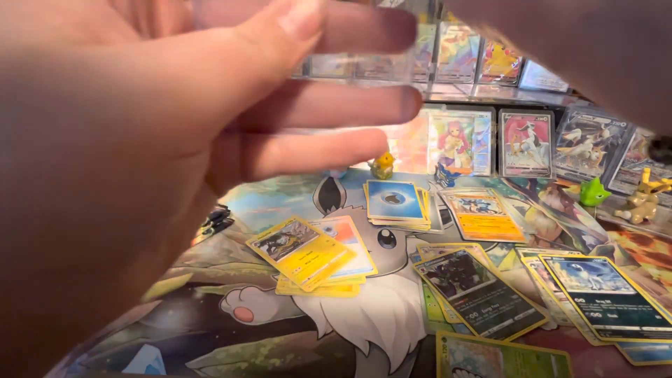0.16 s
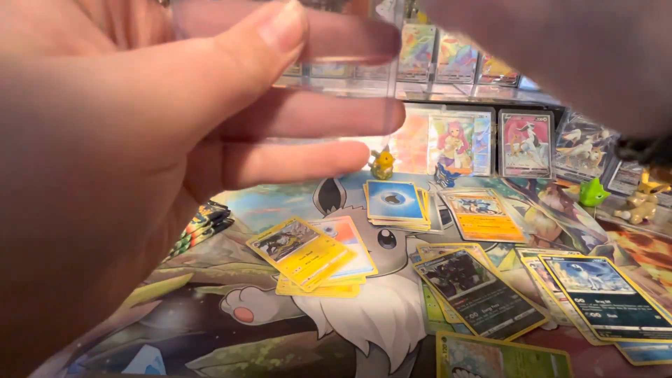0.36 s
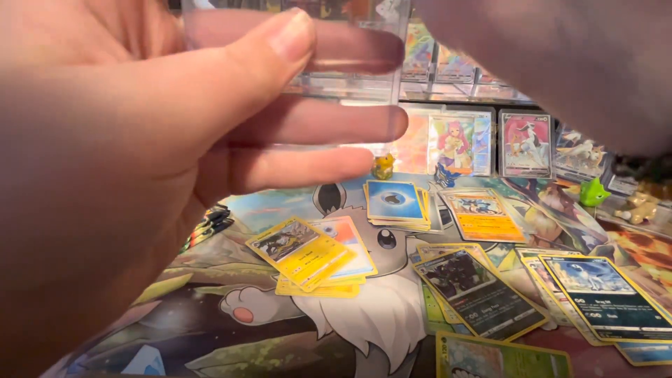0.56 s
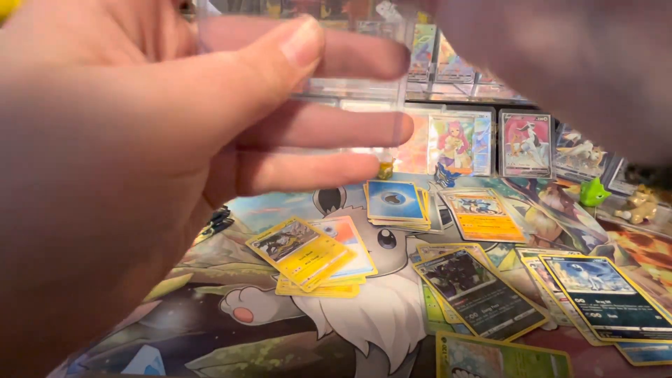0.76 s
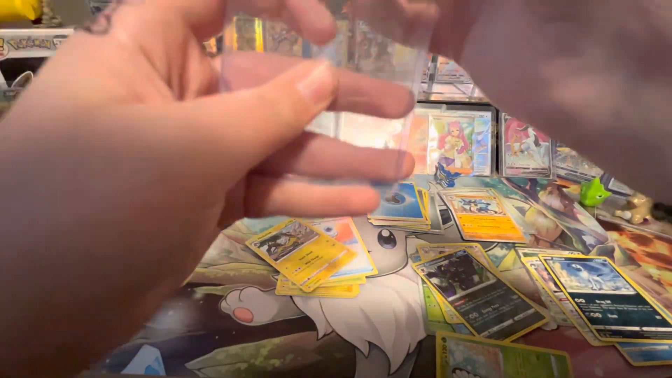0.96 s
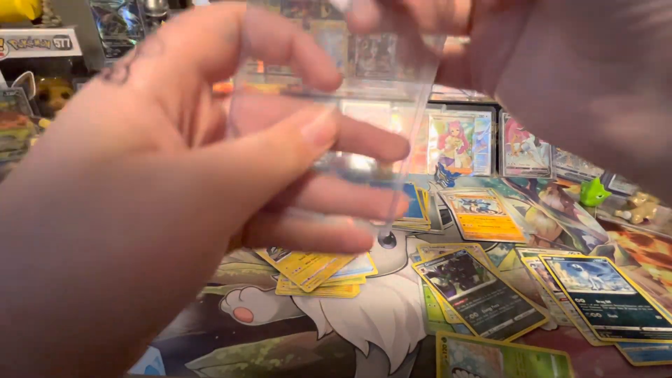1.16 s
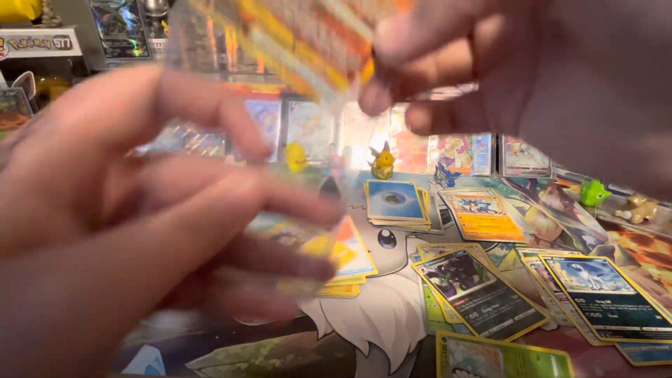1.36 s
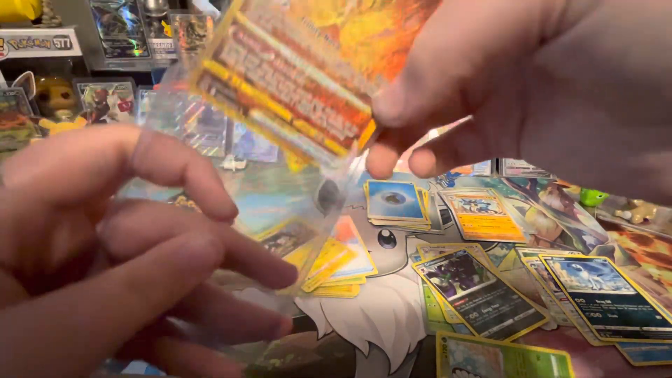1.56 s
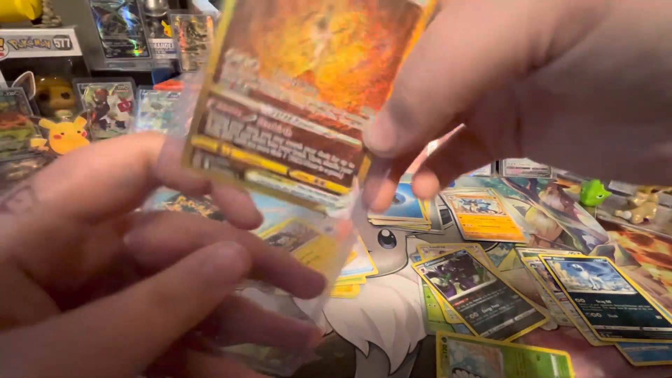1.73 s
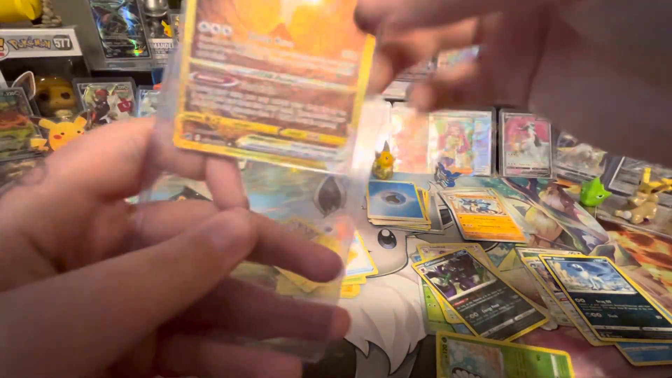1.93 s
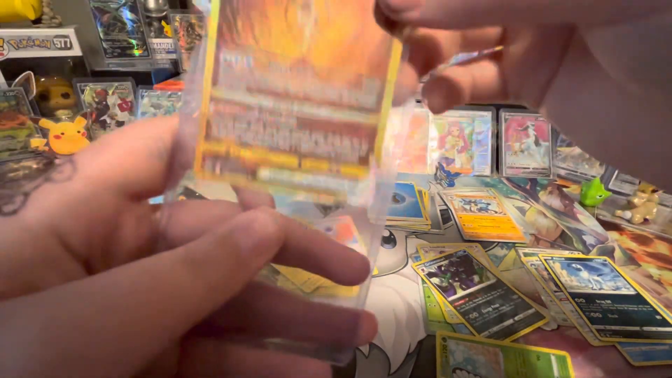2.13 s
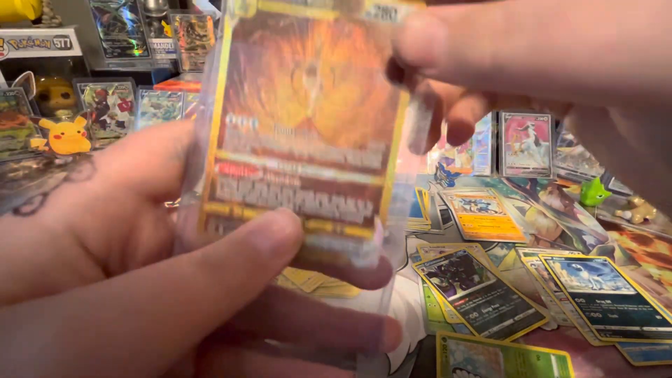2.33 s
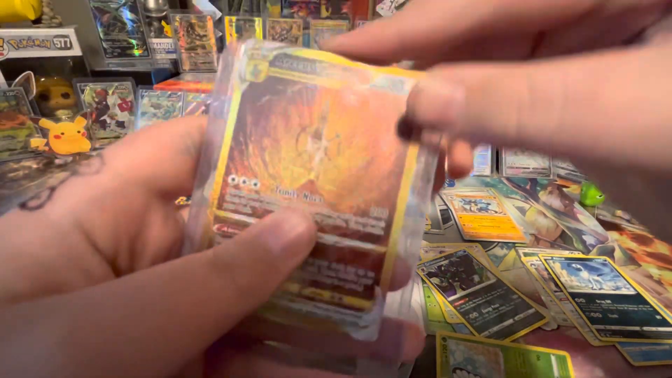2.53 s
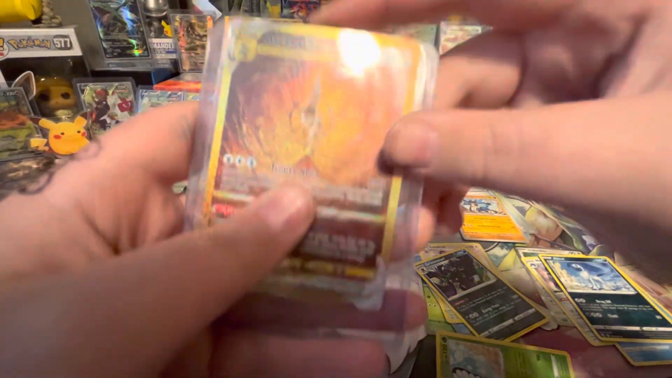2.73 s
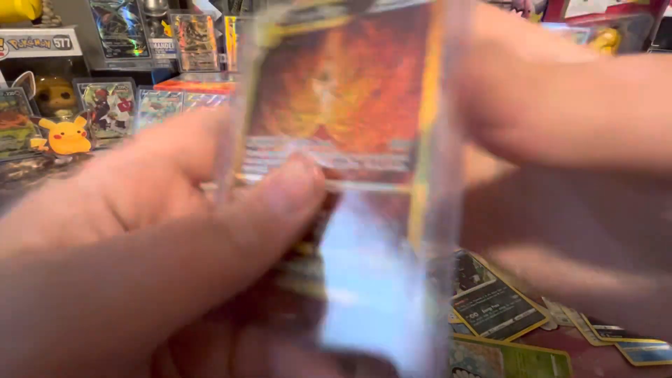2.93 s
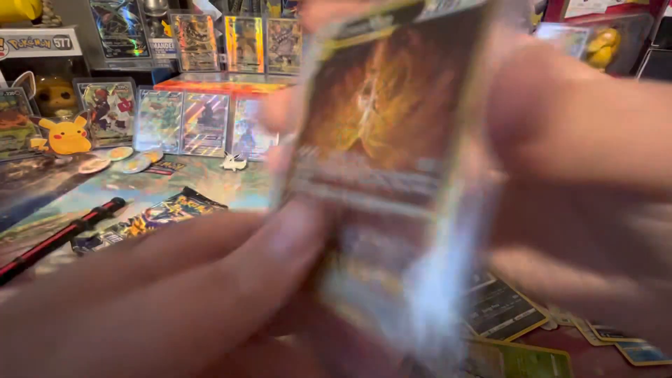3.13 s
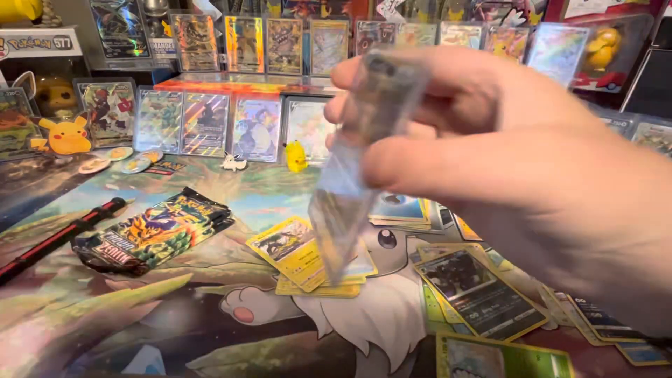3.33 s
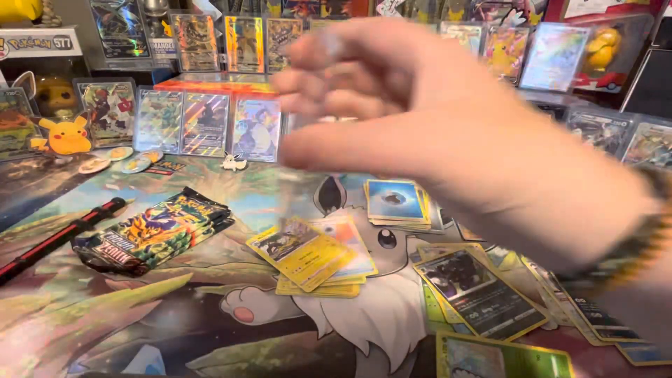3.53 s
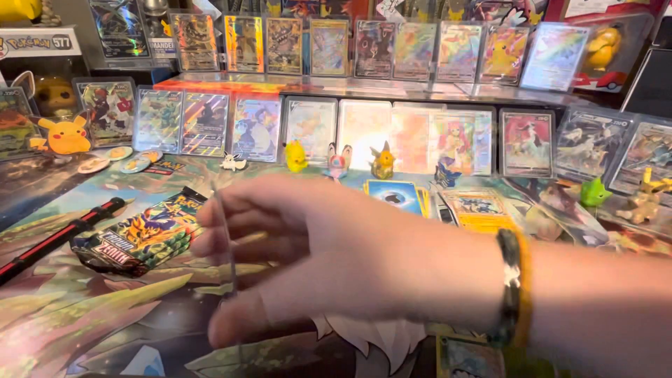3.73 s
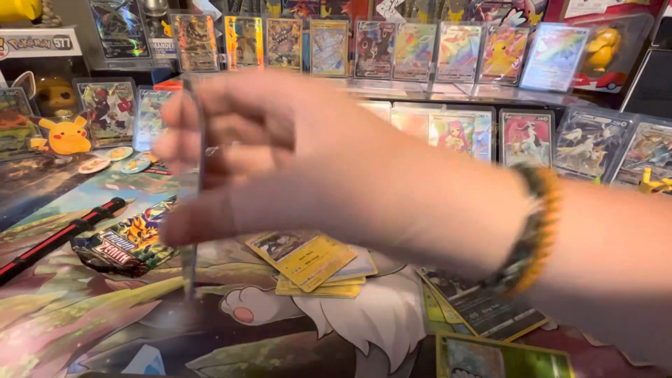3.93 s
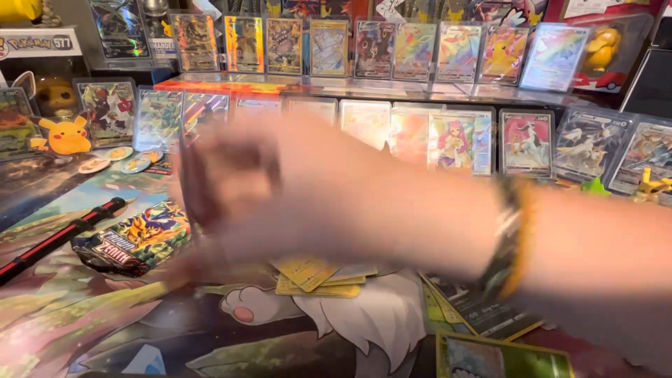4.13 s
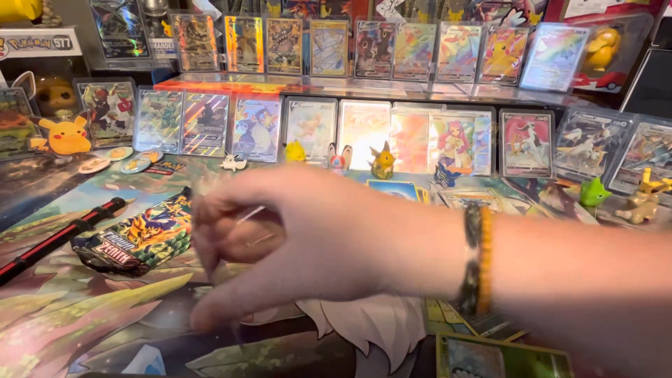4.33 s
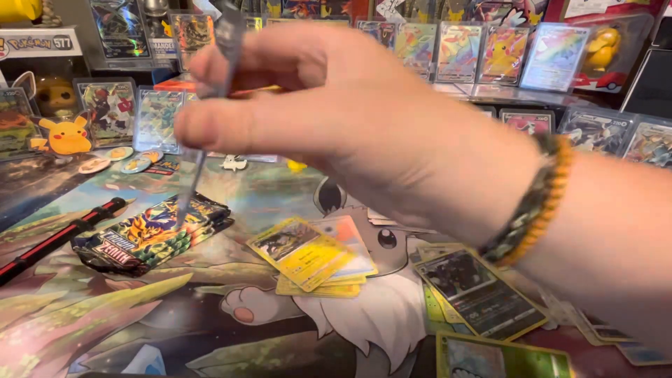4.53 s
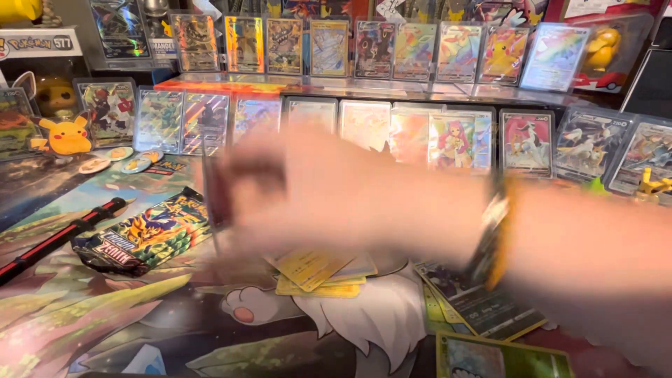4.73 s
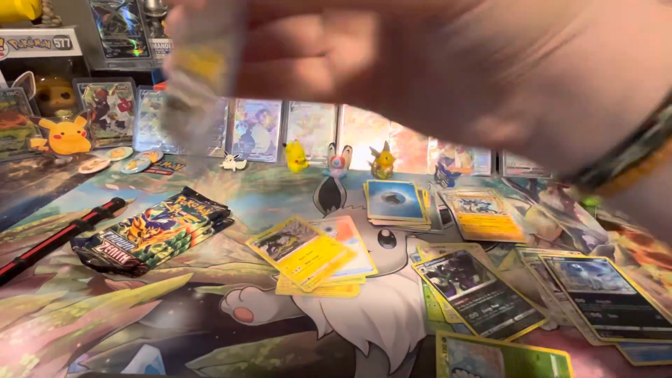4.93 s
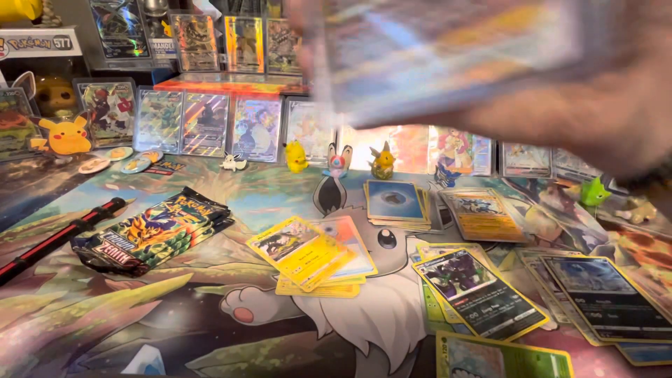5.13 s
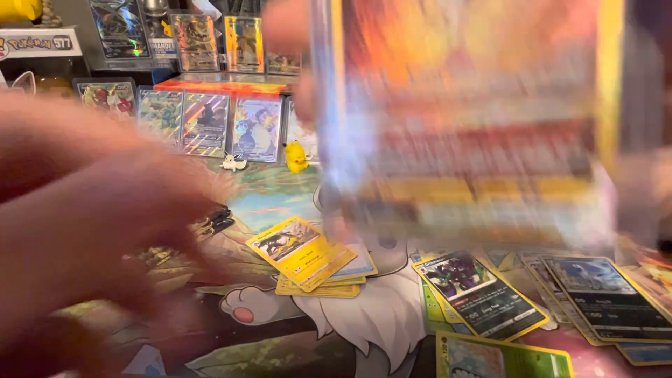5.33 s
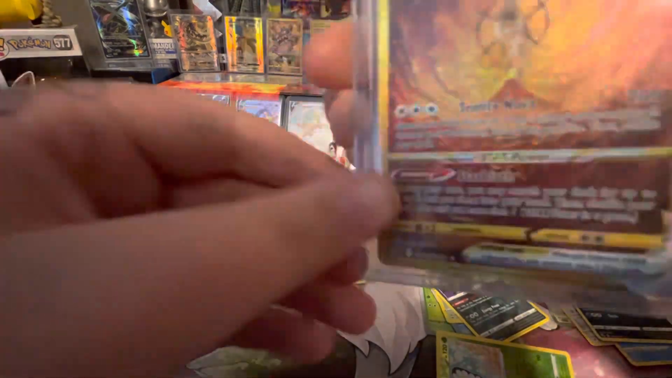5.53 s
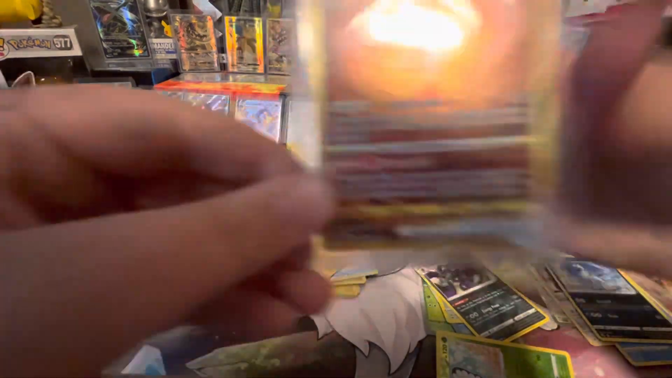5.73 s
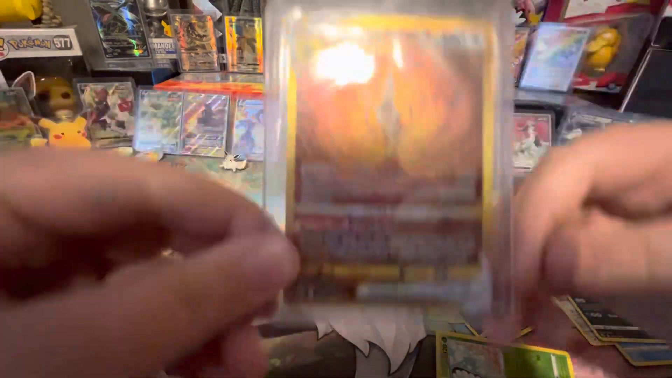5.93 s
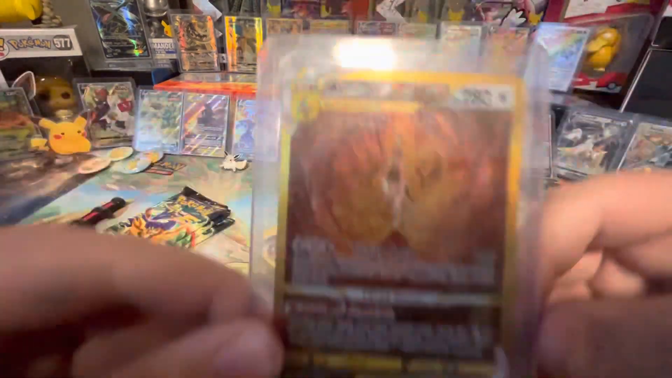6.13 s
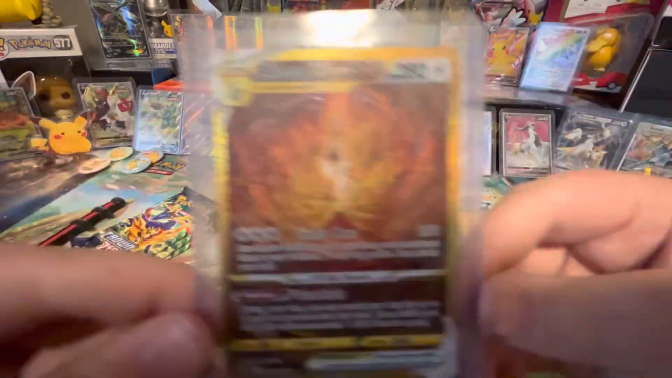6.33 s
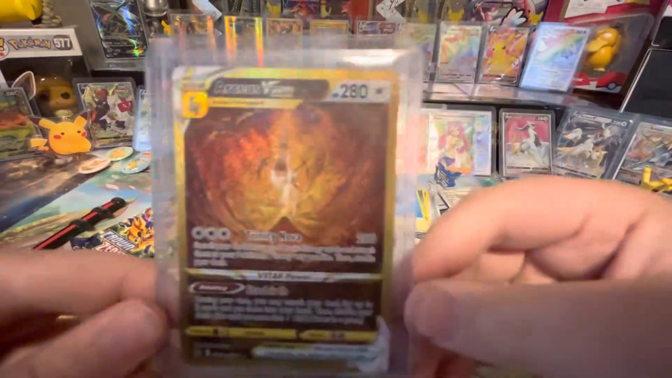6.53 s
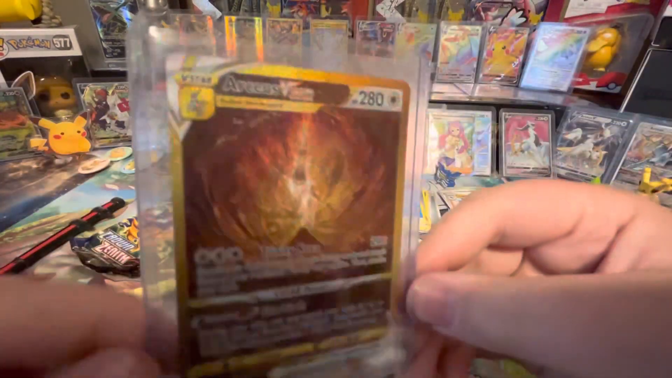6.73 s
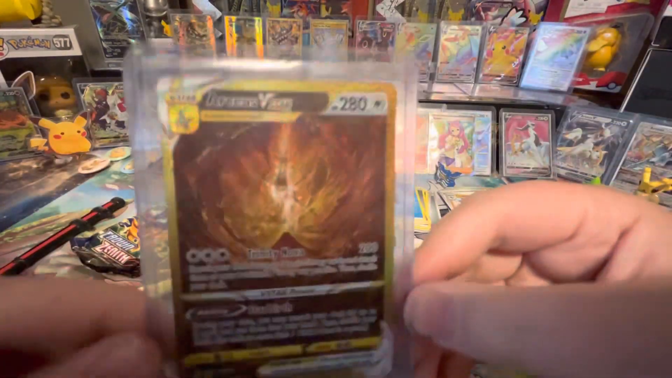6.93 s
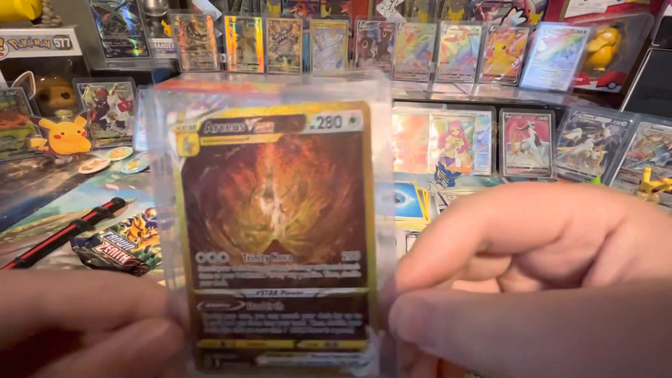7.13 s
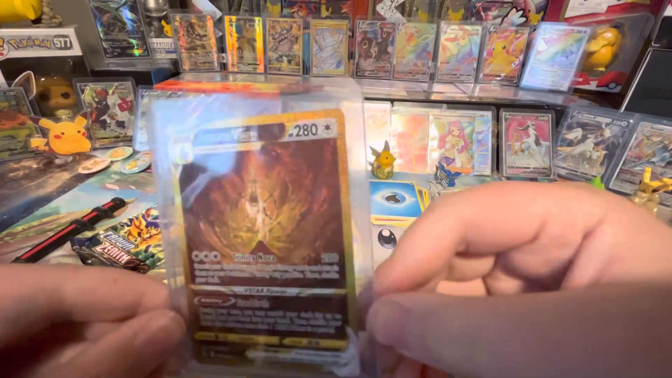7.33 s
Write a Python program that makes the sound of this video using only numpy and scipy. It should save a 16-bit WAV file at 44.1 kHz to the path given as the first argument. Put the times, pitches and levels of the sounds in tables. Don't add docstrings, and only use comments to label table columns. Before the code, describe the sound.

Close plastic rustling and sharp little clicks, four evenly spaced woody knocks with a slight rattle, then quiet finger scuffs in a humming room.

```python
import sys
import numpy as np
from scipy import signal
from scipy.io import wavfile

SR = 44100
rng = np.random.default_rng(int(sys.argv[2]) if len(sys.argv) > 2 else 0)


def gain_from_db(level_db):
    decades = np.asarray(level_db, float) / 20
    return 10 ** decades


def bounce(signal):
    frames = np.transpose(np.atleast_2d(signal))
    limited = np.clip(frames, -1, 1)
    pcm = np.round(limited * 32767).astype(np.int16)
    wavfile.write(sys.argv[1], SR, pcm)


N = 324926
RIGHT_LAG_S = 0.0005


def rms_one(x):
    return x / np.sqrt(np.mean(x ** 2) + 1e-20)


def in_time(rows):
    s, *columns = np.transpose(rows)
    return [np.interp(np.arange(N) / SR, s, column) for column in columns]


def at_hz(points, hz, column=1):
    points = np.array(points)
    return np.interp(np.log(hz), np.log(points[:, 0]), points[:, column])


def drift(rate_hz):
    every = 40
    r = np.exp(-2 * np.pi * rate_hz * every / SR)
    white = rng.standard_normal(N // every + 2002)
    slow = signal.lfilter([1], [1, -2 * r, r * r], white)[2000:]
    return np.interp(np.arange(N) / every, np.arange(len(slow)), rms_one(slow))


def resonance(x, hz, width_hz):
    r = np.exp(-np.pi * width_hz / SR)
    top = np.array([1, 0, -1]) * (1 - r * r) / 2
    return signal.lfilter(top, [1, -2 * r * np.cos(2 * np.pi * hz / SR), r * r], x)


def bands(size):
    # (pitch_hz, likeness from -1 to 1)
    likeness = [(60, 1), (130, 0.78), (290, 0.34), (640, 0.24), (1410, -0.46), (3100, 0.64), (6820, 0.072),
                (15000, 0.23)]
    edges = 25 * 2 ** np.arange(0, 9.6, 0.5)
    white = rng.standard_normal((2, 2, size))
    for k, (low, high) in enumerate(zip(edges, edges[1:])):
        band = signal.butter(2, [low, high], "band", fs=SR, output="sos")
        mid, side = signal.sosfilt(band, white[k % 2])
        hz = np.sqrt(low * high)
        alike = at_hz(likeness, hz)
        yield hz, np.sqrt(1 + alike) * mid + np.sqrt(1 - alike) * side * [[1], [-1]]


def add(out, s, sound):
    i = round(s * SR)
    out[..., i:i + sound.shape[-1]] += sound[..., :N - i]


def place(x, pan_db):
    late = np.roll(x, round(RIGHT_LAG_S * SR))
    return np.array([x * gain_from_db(pan_db / 2), late * gain_from_db(-pan_db / 2)])


def background():
    # (start_s, low_db, upper_db)
    rumble = [(0.0, -59, -76.5), (0.2, -59, -77.5), (0.63, -62, -69.5), (0.8, -58, -66.5),
              (1.13, -56.5, -62.5), (1.31, -59.5, -68), (1.72, -56, -71.5), (1.89, -57.5, -64),
              (2.15, -56, -60), (2.34, -57, -65), (2.52, -63, -71), (2.77, -60, -77), (2.95, -60.5, -68),
              (3.14, -53, -64.5), (3.3, -58.5, -74), (3.45, -60.5, -81), (3.67, -64, -77),
              (3.88, -58, -62.5), (3.94, -60.5, -77), (4.08, -54.5, -69), (4.23, -55, -73.5),
              (4.41, -71, -51), (4.52, -63, -72), (4.62, -54, -62.5), (4.86, -59, -75.5),
              (5.09, -61.5, -74.5), (5.4, -57, -67.5), (5.56, -56.5, -67.5), (6.05, -57.5, -78.5),
              (6.32, -62.5, -76), (6.75, -59, -74.5), (6.96, -60.5, -63), (7.37, -60.5, -83.5)]
    # (pitch_hz, level_db per Hz)
    floor_colour = [(15, -57), (25, -32.5), (43, -4), (82, -7), (123, 2.5), (200, -12), (242, -8),
                    (293, -29.5), (416, -12), (695, -41), (818, -40.5), (4740, -53.5), (7710, -68.5),
                    (9320, -43.5), (16000, -72)]
    # (pitch_hz, width_hz, level_db)
    hum_peaks = [(60.4, 4.1, -11), (118.4, 5.6, -0.5), (240, 4.1, -6), (447, 8.1, -26)]
    low_db, upper_db = in_time(rumble)
    low, upper, hiss = 0, 0, 0
    for hz, noise in bands(size=N):
        floor = gain_from_db(at_hz(floor_colour, hz) + 3.7 * drift(13)) * noise
        if hz < 300:
            low = low + floor
        elif hz < 1000:
            upper = upper + floor
        else:
            hiss = hiss + floor
    white = rng.standard_normal(N)
    hum = sum(gain_from_db(db) * rms_one(resonance(white, hz, width_hz)) for hz, width_hz, db in hum_peaks)
    sound = gain_from_db(low_db) * (gain_from_db(-0.5) * rms_one(low) + gain_from_db(-5.5) * hum)
    sound = sound + gain_from_db(upper_db) * rms_one(upper) + gain_from_db(-83.5) * rms_one(hiss)
    return sound * gain_from_db([[1.2], [-1.2]])


def slide():
    # (start_s, hiss_db, sheen_db above 9 kHz, body_db below 2.5 kHz, left_right_db)
    strokes = [
        [(0.0, -77.5, -3, 12.5, 11), (0.12, -82.5, 13.5, -8, -7), (0.28, -77.5, 7.5, 7, -4),
         (0.41, -85, 9, 11, -2), (0.52, -97, -7, -14, 8), (0.62, -80.5, 2, 7.5, 4), (0.85, -86, 6, -8, 6),
         (0.92, -76.5, 2, 8.5, 8), (1.03, -70, -1, 3, 6), (1.13, -81.5, -13.5, 1, 11),
         (1.17, -66, 23.5, 23, -7), (1.25, -69, -12.5, -4, 17), (1.35, -70, 1, 0, 8), (1.46, -73.5, -17, 0, 13),
         (1.47, -68.5, 6, 12, 6), (1.5, -70, -10.5, -9, 1), (1.52, -66.5, 23.5, 18, -4), (1.53, -87, -7, -4, 6),
         (1.58, -80, -5, -33, 14), (1.65, -60.5, 0.5, -4.5, 6), (1.8, -73, 23, 14.5, 4),
         (1.89, -92.5, -28, 5, 11), (2.09, -76.5, 27, 17.5, 10.5), (2.18, -59.5, -8, -8.5, 7.5),
         (2.21, -59.5, 10, -0.5, 5.5), (2.34, -66.5, 3.5, -5, 8), (2.39, -60.5, 5.5, -8, 8),
         (2.48, -71, 18, 19.5, 7), (2.62, -89, -13, -25, 7), (2.73, -76.5, 5.5, -12, 8),
         (2.78, -77, 32, 21.5, 2), (2.8, -80.5, 11, -4, 2), (2.89, -79, -9.5, 5.5, 12.5),
         (3.08, -65, 2, 6.5, 4), (3.1, -66, 7.5, 7.5, 6), (3.18, -73, 29.5, 24.5, 9), (3.33, -84, -12, 3, 10),
         (3.49, -80, 4, 11.5, 7), (3.57, -84.5, 2, -26, 3), (3.66, -90.5, 1, 20, 18)],
        [(4.1, -103, -8.5, 16, 7), (4.12, -88, 4.5, 7, 7), (4.18, -77.5, 6, 7, 3), (4.258, -79.5, -2.5, 4, 7),
         (4.28, -95.5, -9.5, 24, -2)],
        [(4.85, -83, -12, 7, 4.5), (4.92, -90.5, 15.5, 2, 3), (4.98, -88, 2, -7, 6), (5.06, -83.5, 12.5, 21, 1),
         (5.14, -84, -23, -10, 5), (5.21, -80, 11, 12, -0.5), (5.28, -85, -20, 13, 8.5),
         (5.42, -91, -6.5, 24.5, 2.5), (5.56, -81, 4.5, 6.5, 5), (5.6, -83.5, 5, 26, 3), (5.8, -89, 2, -9, 6),
         (5.87, -91, 12, 13.5, 5), (5.93, -93, -17.5, -14, 3.5), (6.01, -89, 2, 27.5, 8),
         (6.05, -93.5, -26, 11, 5.5), (6.09, -80, 7, 15, 2), (6.12, -90, 4, -21, 3), (6.21, -85, -2, -10, 7),
         (6.24, -84, 18.5, 2, 3), (6.33, -86, 5.5, -9, -1), (6.4, -93, -9, -7.5, 8), (6.67, -86, 13, -4.5, 3.5),
         (6.81, -92, -10, -17, 3.5), (6.87, -88, 13.5, -10, 2.5), (6.99, -84, 13, 9.5, 4.5),
         (7.14, -89, -9, -10, 6), (7.27, -85, 5, -3, 3.5), (7.35, -93, -24, -13, 7), (7.37, -87, -15, -1, 5.5)],
    ]
    # (pitch_hz, level_db per Hz)
    hiss_colour = [(350, -32), (600, -14), (823, -4.5), (1280, -13), (2010, -7), (2680, -7), (3990, 2.5),
                   (7210, -0.5), (11500, -2), (14100, -9), (16000, -45.5)]
    hiss_db, sheen_db, body_db, pan_db = in_time(np.vstack(strokes))
    grain = drift(40)
    hiss = 0
    for hz, noise in bands(size=N):
        if hz < 500:
            continue
        shade_db = 0
        if hz > 9000:
            shade_db = sheen_db
        elif hz < 2500:
            shade_db = body_db + 8
        flicker_db = 1.8 * grain + 1.6 * drift(25)
        hiss = hiss + gain_from_db(at_hz(hiss_colour, hz) + shade_db + flicker_db) * noise
    return gain_from_db(hiss_db + 5 + pan_db / 2 * [[1], [-1]]) * hiss


def snaps():
    # (start_s, peak_db, low_db, high_db, left_right_db)
    edge_snaps = [(0.3865, -36, -15.5, -9, 12), (0.607, -56, -12, -16, 7), (1.0445, -52.5, -3, -14, 13),
                  (1.1774, -24.5, -21, -5, 16), (1.3154, -41.5, -27, -23, 12), (1.3977, -35.5, -15, 3, 10),
                  (1.4641, -33, -16.5, -2.5, 13.5), (1.514, -27.5, -15, -13.5, 12),
                  (1.7604, -33.5, -24, -12, 10), (2.0288, -33.5, -12, -10.5, 8),
                  (2.4144, -40.5, -11, -23, 11), (2.4628, -17, -15.5, -14, 10),
                  (2.7706, -39, -18.5, -9, 13.5), (3.1213, -34, -13.5, -8.5, 13.5),
                  (3.5299, -48.5, -29.5, -3.5, 8), (3.5513, -58, -17, -13, 5), (5.0489, -34, -8.5, -14, -1),
                  (6.3405, -58.5, -27, -5.5, 3.5)]
    # (pitch_hz, width_hz, level_db)
    modes = [(1800, 750, 5.5), (3200, 670, 6.5), (5060, 990, 1.5), (7100, 830, -4), (10040, 2200, 5.5),
             (12800, 1800, -8.5)]
    out, t = np.zeros((2, N)), np.arange(1500) / SR
    for s, db, low_db, high_db, pan_db in edge_snaps:
        fade = np.exp(-t / 0.00072) + gain_from_db(-14.5) * np.exp(-t / 0.0047)
        crackle = rng.standard_normal(len(t)) * fade
        tone, sign = 0, 1
        for hz, width_hz, mode_db in modes:
            share_db = low_db + 4 if hz < 4000 else high_db if hz > 8000 else -4
            tone = tone + sign * gain_from_db(mode_db + share_db) * resonance(crackle, hz, width_hz)
            sign = -sign
        add(out, s, place(gain_from_db(db) * tone / np.abs(tone).max(), pan_db))
    return out


def room_tail(x):
    # (pitch_hz, fade_s)
    fades = [(200, 0.36), (1000, 0.19), (4000, 0.2), (12000, 0.18)]
    t = np.arange(17640) / SR
    tail = sum(noise * gain_from_db(-60 * t / at_hz(fades, hz)) for hz, noise in bands(size=len(t)))
    tail = tail * (t > 0.004)
    tail = tail / np.sqrt(np.sum(tail ** 2))
    return signal.fftconvolve(x.mean(axis=0, keepdims=True), tail, axes=1)[:, :N]


def flick():
    # (start_s, level_db)
    burst = [
        (1.145, -83),
        (1.163, -36.5),
        (1.179, -30),
        (1.205, -48.5),
        (1.26, -62),
    ]
    # (pitch_hz, width_hz, level_db)
    sleeve = [(6170, 16, -8.5), (6830, 34, 2), (7950, 31, -7.5), (11300, 36, -6), (13300, 130, -14)]
    level_db, = in_time([(burst[0][0] - 0.002, -120), *burst, (burst[-1][0] + 0.03, -120)])
    slips = rng.standard_normal(N) * gain_from_db(2.5 * rng.exponential(1, N))
    tone = gain_from_db(-25) * slips
    for k, (hz, width_hz, db) in enumerate(sleeve):
        tone = tone + (-1) ** k * gain_from_db(db) * resonance(slips, hz, width_hz)
    return place(gain_from_db(level_db) * rms_one(tone), 8.2)


def bumps():
    # (start_s, peak_db, pitch_hz)
    pushes = [(1.928, -49, 135), (2.459, -44, 229), (2.989, -48, 62.3), (3.078, -44, 73.5),
              (5.392, -46, 80), (5.816, -38.5, 124), (6.074, -44.5, 129)]
    out, t = np.zeros((2, N)), np.arange(6000) / SR
    for s, db, hz in pushes:
        shape = (t / 0.013) * np.exp(1 - t / 0.0096)
        add(out, s, place(gain_from_db(db + 0.5) * shape * np.sin(2 * np.pi * hz * t), 2))
    return out


def scuffs():
    # (start_s, peak_db, length_s)
    grips = [(2.7725, -46.5, 0.035), (2.9506, -51, 0.04), (3.048, -46.5, 0.034), (3.4545, -55.5, 0.033),
             (5.189, -52.5, 0.045), (5.381, -61, 0.04), (5.5955, -49.5, 0.04), (5.6294, -54.5, 0.033),
             (5.701, -66, 0.034), (5.8665, -67, 0.031), (5.9818, -61, 0.034), (6.065, -64.5, 0.032),
             (6.227, -64.5, 0.058)]
    # (pitch_hz, width_hz, level_db)
    holder = [(900, 240, -13), (1577, 200, -1), (2000, 210, -13), (3020, 370, 0), (4700, 600, -8.5)]
    out, t = np.zeros((2, N)), np.arange(8000) / SR
    for s, db, length_s in grips:
        white = rng.standard_normal(len(t))
        shape = (1 - np.exp(-t / 0.0016)) * np.exp(-(t / length_s) ** 2)
        tone = sum(gain_from_db(mode_db) * rms_one(resonance(white, hz, width_hz)) for hz, width_hz, mode_db in holder)
        add(out, s, place(gain_from_db(db - 13.5) * shape * tone, 12))
    return out


def knocks():
    # (start_s, peak_db, upper_db, crack_db, thud_db)
    hits = [
        (3.68, -13, -7.5, -10, -25),
        (3.984, -11.5, -17, -21, -21.5),
        (4.295, -11, -13.5, -22.5, -17.5),
        (4.61, -9.5, -7, -13, -17.5),
    ]
    # (pitch_hz, level_db, fade_s to -60 dB)
    table = [(124, -24.5, 2.0), (172.7, -26.5, 0.7), (240.6, -9.5, 0.22), (325.3, 2.5, 0.19),
             (470.5, -12.5, 0.65), (549, -23, 0.43), (655, -40, 0.72), (768, -19, 0.67), (846, -24.5, 4.3),
             (896, -7.5, 0.19), (958, -19.5, 0.33), (1010, -11.5, 0.14), (1110, -19, 0.27),
             (1205, -6.5, 0.097), (1264, -22.5, 0.27), (1480, -34.5, 0.3), (1600, -30, 0.22),
             (1740, -38, 0.32), (1860, -44, 0.82), (1990, -41, 0.31), (1955, -30.5, 0.13),
             (2240, -48.5, 0.18)]
    # (pitch_hz, level_db, fade_s to -60 dB)
    rattle = [(99, -0.5, 0.21), (304, 3, 0.28), (950, 6.5, 0.23), (1430, -3.5, .3), (2900, -23, 0.26),
              (6000, -24, 0.31), (11900, -30, .25)]
    # (pitch_hz, width_hz, level_db)
    edge = [(3080, 370, 8), (4610, 1100, 14), (6640, 1400, -22), (11000, 4000, -21)]
    out, t = np.zeros((2, N)), np.arange(22050) / SR
    for s, db, upper_db, crack_db, thud_db in hits:
        sound = np.zeros((2, len(t)))
        for hz, mode_db, fade_s in table:
            share_db = thud_db + 14 if hz < 170 else upper_db + 12 if hz > 650 else 0
            strength = gain_from_db(mode_db + share_db + rng.normal(0, 3.0, (2, 1)))
            swell = 1 - np.exp(-(t * hz / 0.59) ** 2)
            fade = gain_from_db(-60 * t / np.clip(fade_s, 0.05, 0.4))
            lag = np.array([[0], [1]]) * 2 * np.pi * hz * RIGHT_LAG_S
            phase = rng.uniform(0, 2 * np.pi) - lag
            sound += strength * swell * fade * np.sin(2 * np.pi * hz * t + phase)
        for hz, noise in bands(size=len(t)):
            share_db = 0
            if hz < 170:
                share_db = thud_db + 14
            elif hz > 2400:
                share_db = crack_db + 14
            elif hz > 650:
                share_db = upper_db + 4
            swell = 1 - np.exp(-t * hz / 0.49)
            fade = gain_from_db(-60 * t / at_hz(rattle, hz, column=2))
            sound += gain_from_db(at_hz(rattle, hz) + share_db - 9) * swell * fade * rms_one(noise)
        click = rng.standard_normal((2, len(t))) * (1 - np.exp(-t / 0.0011)) * np.exp(-t / 0.0014)
        crack = sum(gain_from_db(mode_db) * resonance(click, hz, width_hz) for hz, width_hz, mode_db in edge)
        sound += gain_from_db(crack_db + 12.5) * crack
        add(out, s, gain_from_db(db - 6) * sound * gain_from_db([[1.5], [-1.5]]))
    return out


def scene():
    steady = background() + slide()
    near = snaps() + flick() + scuffs()
    return steady + near + gain_from_db(-3.5) * room_tail(near) + bumps() + knocks()


def roll_off(x):
    return signal.sosfilt(signal.butter(12, 16650, fs=SR, output="sos"), x)


def record(dry):
    return roll_off(dry)


dry = scene()
out = record(dry)
bounce(out)
```